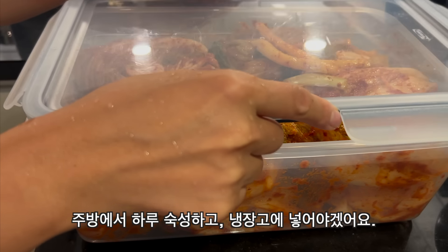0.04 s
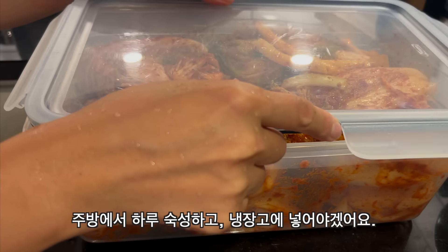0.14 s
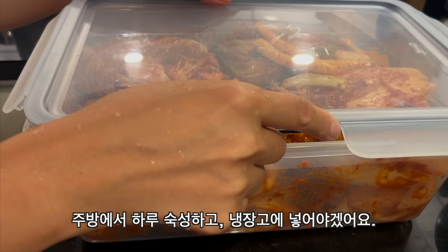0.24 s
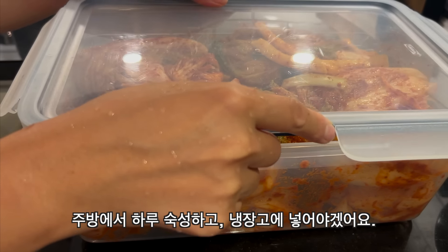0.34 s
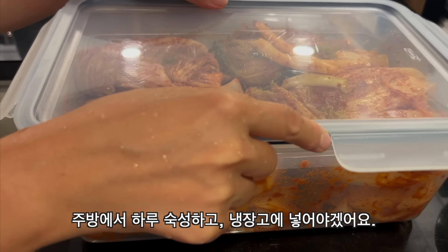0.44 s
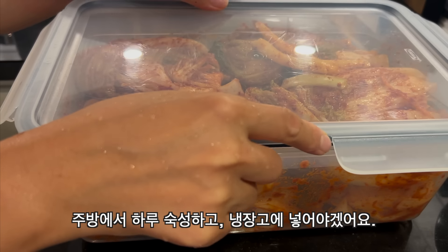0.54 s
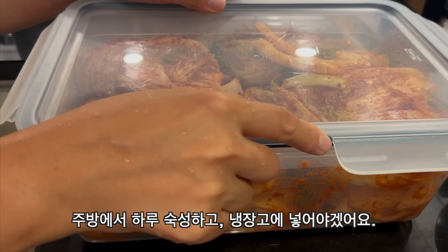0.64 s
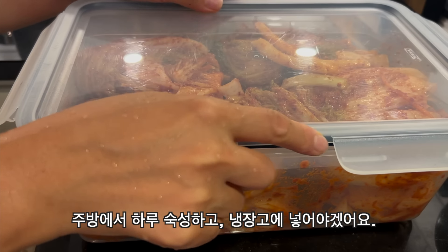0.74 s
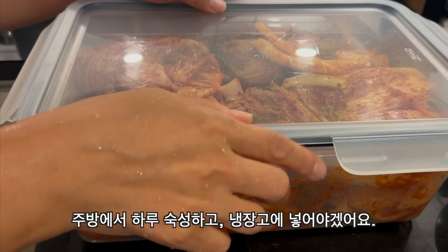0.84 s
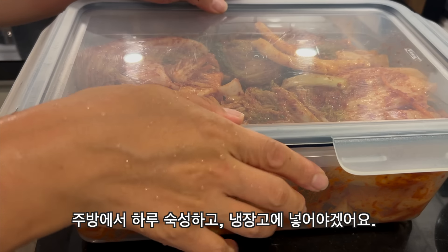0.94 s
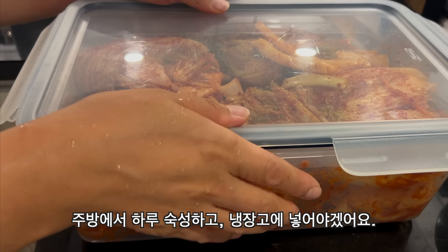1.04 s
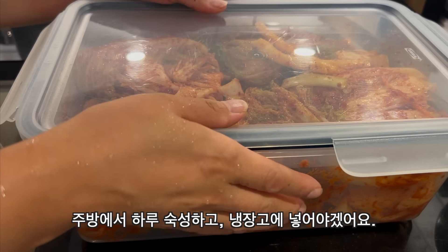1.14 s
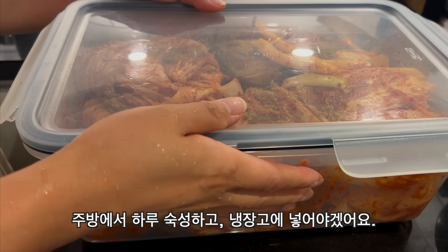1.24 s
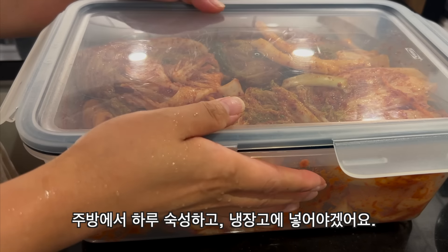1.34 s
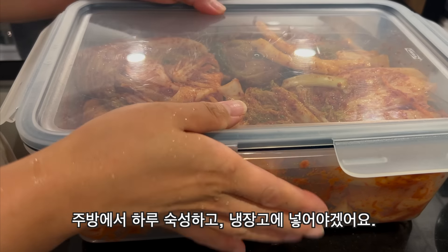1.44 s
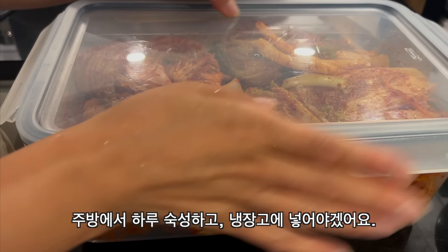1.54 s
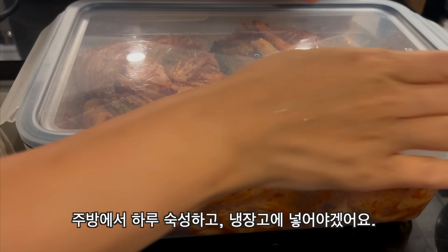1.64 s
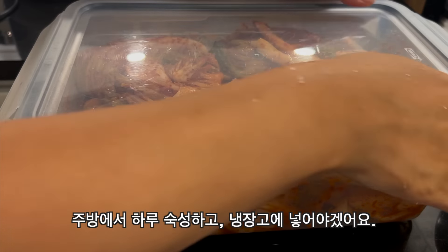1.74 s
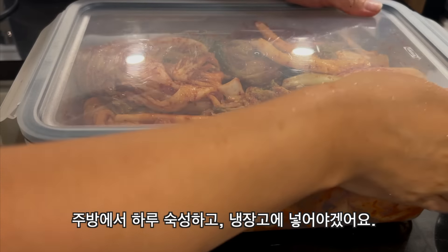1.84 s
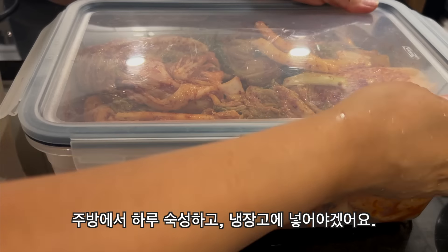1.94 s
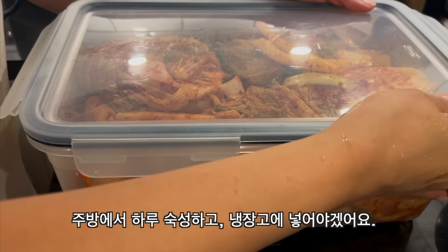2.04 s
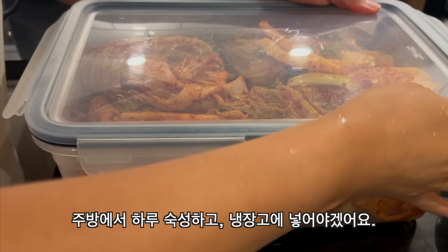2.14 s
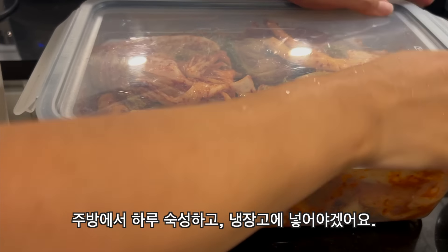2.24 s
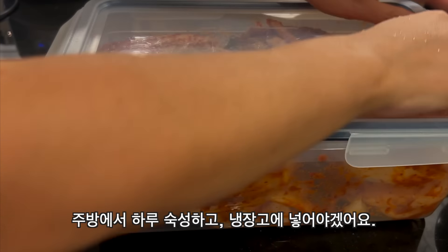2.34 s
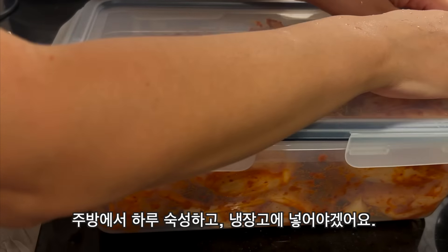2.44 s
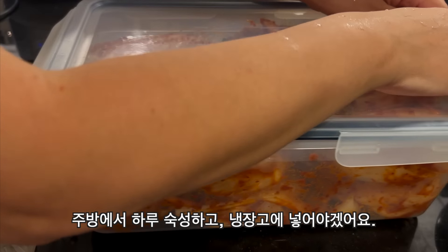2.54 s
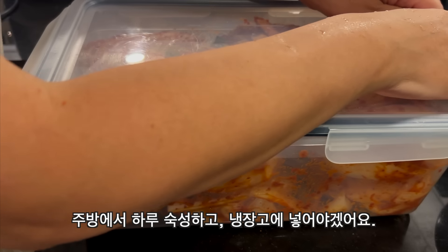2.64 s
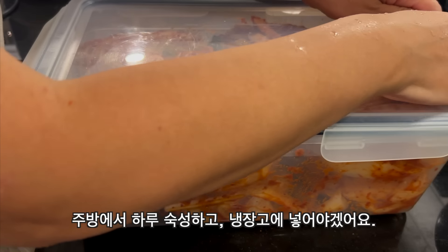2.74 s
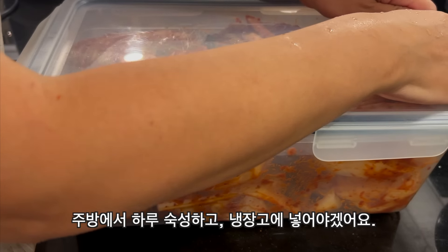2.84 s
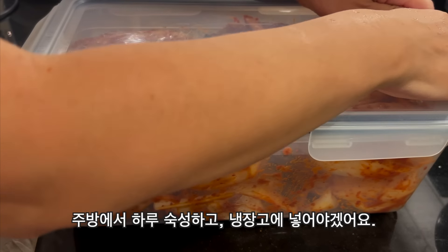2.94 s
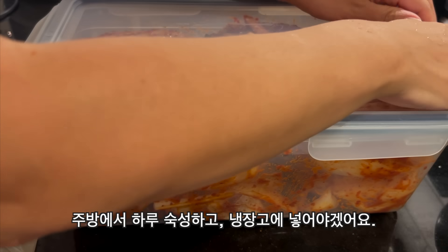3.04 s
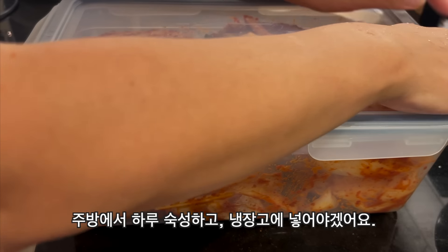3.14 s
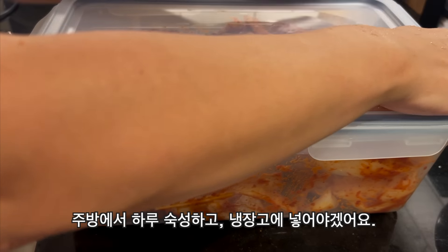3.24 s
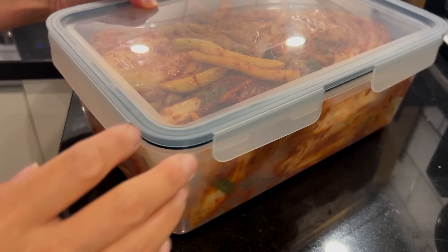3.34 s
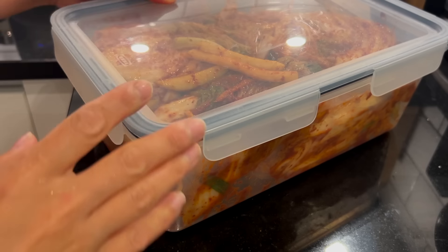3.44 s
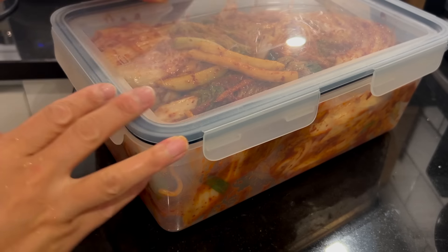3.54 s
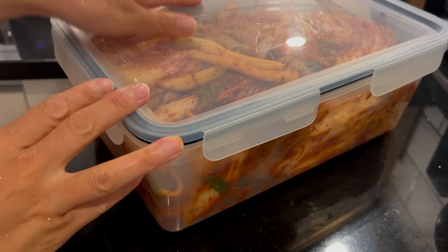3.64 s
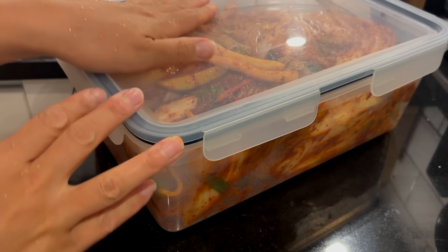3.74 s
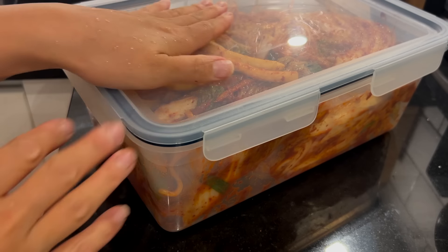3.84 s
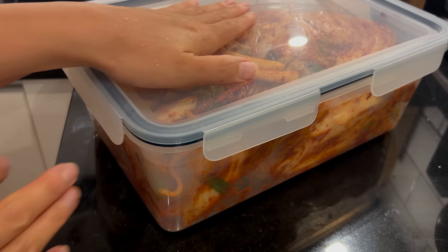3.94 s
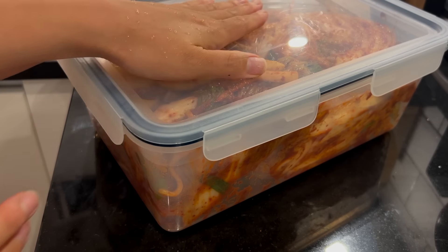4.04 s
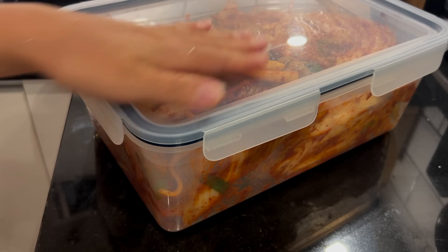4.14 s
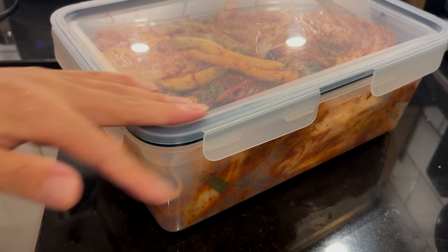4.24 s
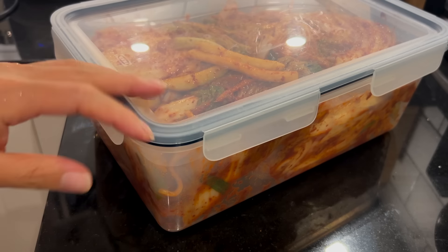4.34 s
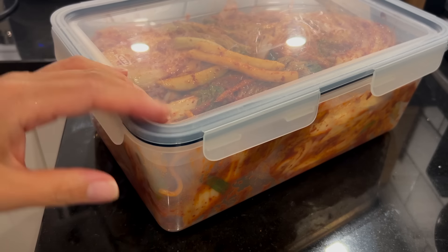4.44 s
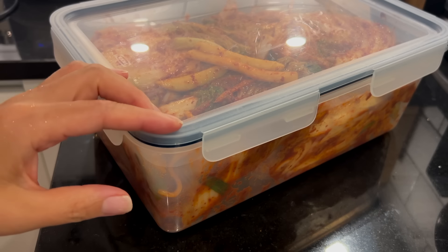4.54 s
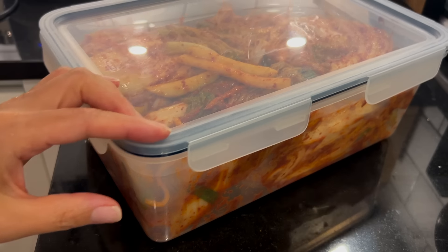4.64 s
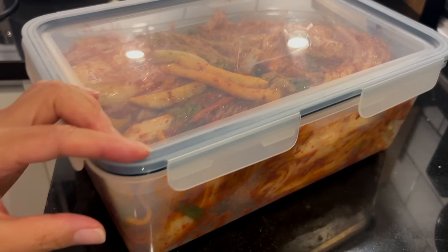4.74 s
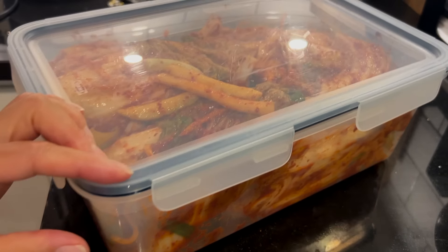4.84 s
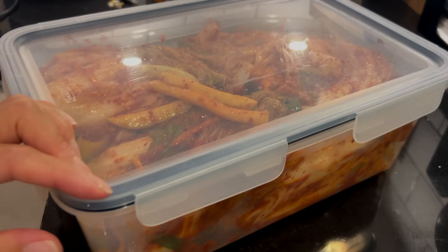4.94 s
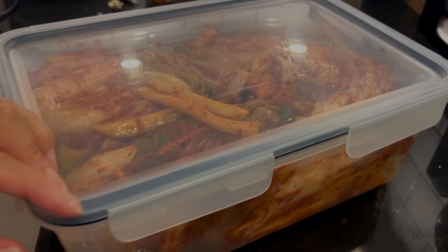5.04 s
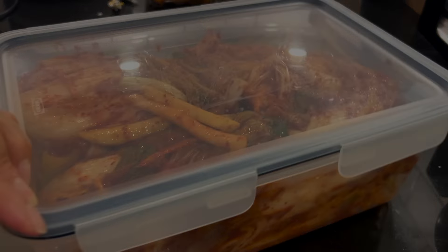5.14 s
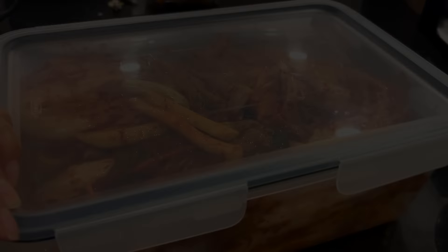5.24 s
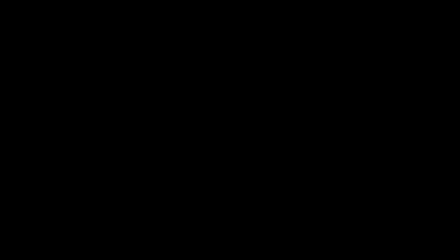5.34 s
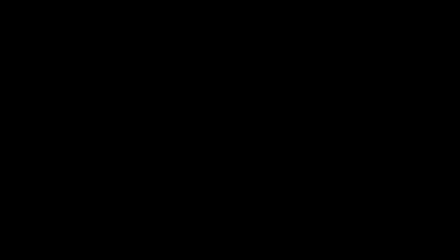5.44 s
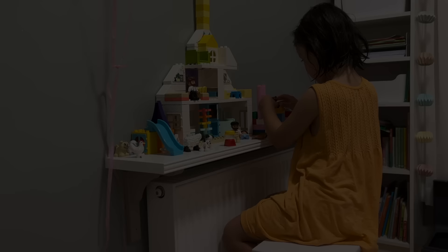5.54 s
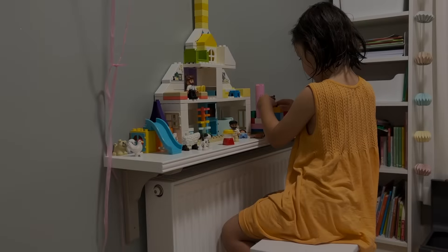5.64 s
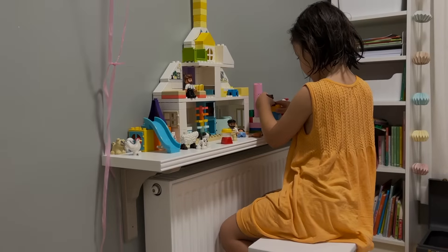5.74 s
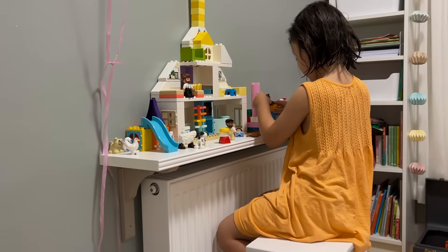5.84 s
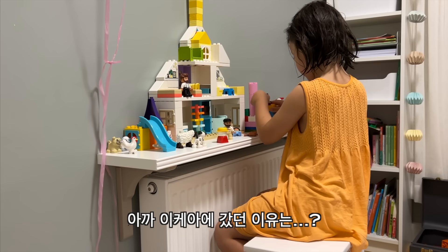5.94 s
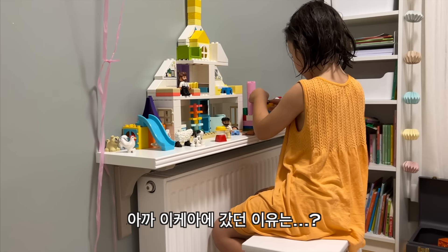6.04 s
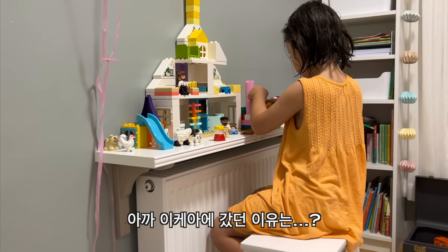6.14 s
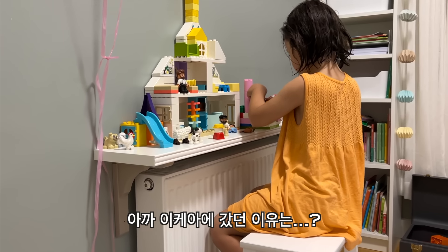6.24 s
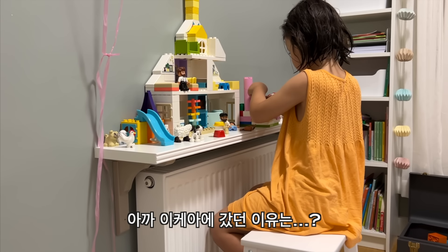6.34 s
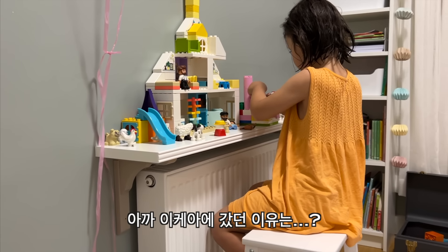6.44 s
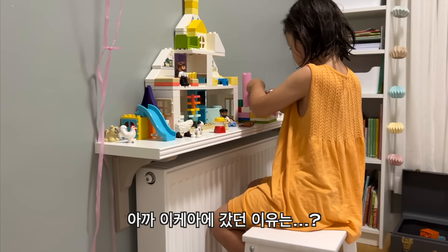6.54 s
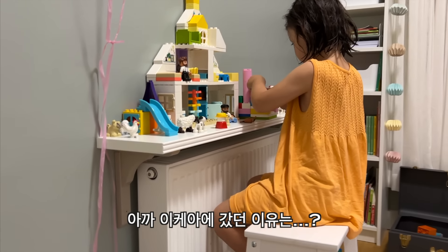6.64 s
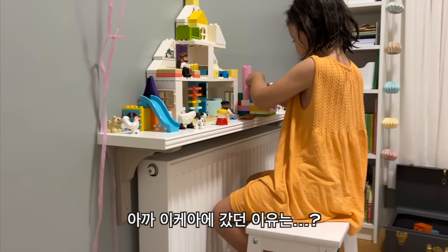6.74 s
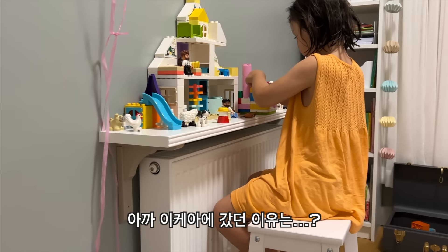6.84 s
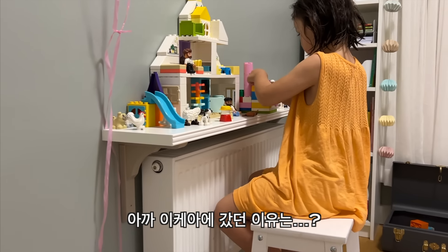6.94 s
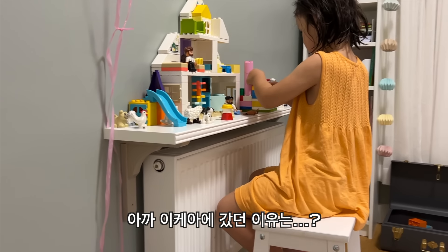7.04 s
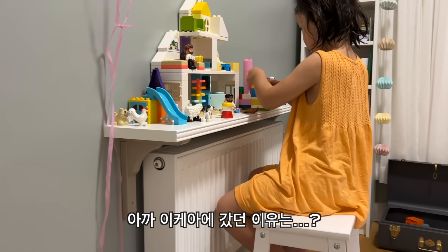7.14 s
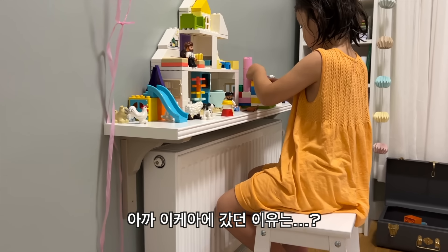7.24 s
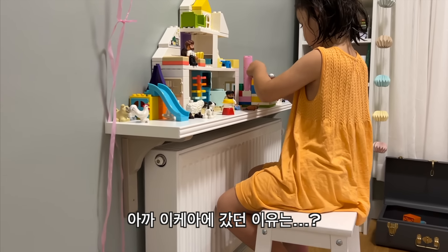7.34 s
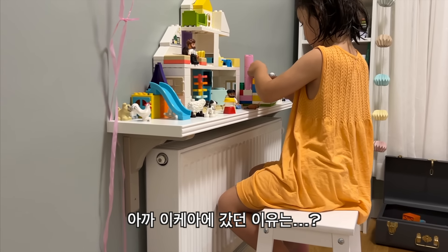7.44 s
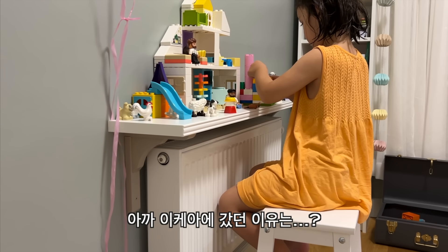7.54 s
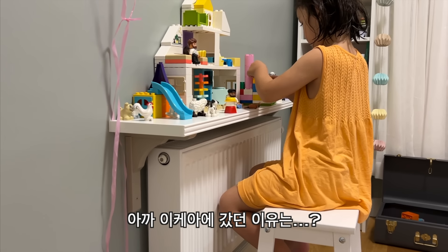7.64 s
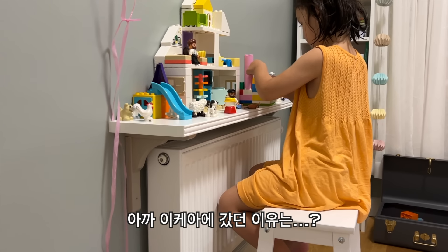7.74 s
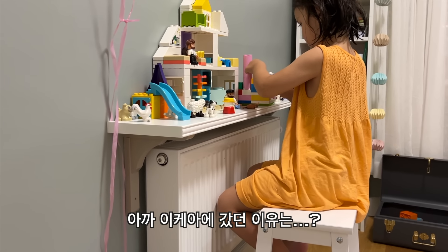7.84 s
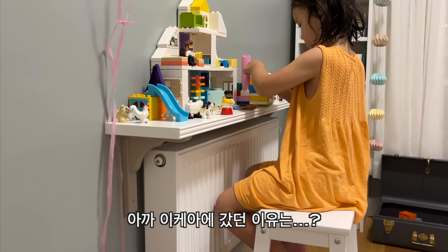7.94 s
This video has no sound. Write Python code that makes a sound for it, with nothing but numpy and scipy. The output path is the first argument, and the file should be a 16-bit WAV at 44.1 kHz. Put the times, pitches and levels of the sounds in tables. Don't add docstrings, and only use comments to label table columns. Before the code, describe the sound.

Close phone-like stereo in a hard kitchen with low rumble and appliance hum. At 0.1 s a stiff plastic flap snaps over the rim with a hollow knock; smaller snaps follow at 0.3 and 0.45, then a low bump at 0.5. A rough drag and weighty push at 1.0 lead into very loud cracks at 1.15-1.3, the lid ringing briefly and the seal buzzing. Softer clicks from 1.8 build to another violent snap at 2.0, with a thump and short rattle. From 2.3 to 5.3 it is much quieter: palms rub and swish, light ticks at 2.55, a dull bump at 3.2, a tiny squeak near 4.15, taps at 4.2-4.3. Around 5.5 the sound dips into a quieter room. From 5.7 small hard bricks click irregularly on a shelf, clearest at 5.8, 6.2 and 6.4, with faint scrapes and a soft knock near 6.85, thinning to sparse clicks at 7.3 and 7.9.

```python
import sys
import numpy as np
from scipy import signal
from scipy.fft import rfft, irfft, next_fast_len
from scipy.io import wavfile

SR = 44100
rng = np.random.default_rng(int(sys.argv[2]) if len(sys.argv) > 2 else 0)


def to_linear_factor(level_db):
    exponent = np.asarray(level_db, float) / 20
    return 10 ** exponent


def waveform_to_disk(signal):
    frames = np.transpose(np.atleast_2d(signal))
    scaled = np.clip(frames, -1, 1) * 32767
    samples = np.round(scaled).astype(np.int16)
    wavfile.write(sys.argv[1], SR, samples)


N = 352844

# time in seconds, rumble level in dB.
HOUSE = [(0, -54.5), (2.3, -55), (2.8, -51), (5.3, -51), (5.7, -70), (6.9, -72.5), (8, -76)]


def rms_one(x):
    return x / np.sqrt(np.mean(x ** 2) + 1e-20)


def in_time(rows):
    s, *columns = np.transpose(rows)
    return [np.interp(np.arange(N) / SR, s, column) for column in columns]


def at_hz(points, hz):
    table_hz, values = np.transpose(points)
    return np.interp(np.log(hz), np.log(table_hz), values)


def band_filter(x, order, edge_hz, kind):
    return signal.sosfilt(signal.butter(order, edge_hz, kind, fs=SR, output="sos"), x)


def notch(x, hz, width_hz):
    return signal.lfilter(*signal.iirnotch(hz, hz / width_hz, fs=SR), x)


def drift(rate_hz):
    r = np.exp(-2 * np.pi * rate_hz * 40 / SR)
    white = rng.standard_normal(N // 40 + 2002)
    slow = signal.lfilter([1], [1, -2 * r, r * r], white)[2000:]
    return np.interp(np.arange(N) / 40, np.arange(len(slow)), rms_one(slow))


def add(out, s, sound, pan_db):
    i = round(s * SR)
    gains = to_linear_factor(np.array([[pan_db], [-pan_db]]) / 2)
    out[:, i:i + sound.shape[-1]] += gains * sound[..., :N - i]


def ring(hz, t60, rise_s, phase=0):
    t = np.arange(SR // 4) / SR
    envelope = to_linear_factor(-60 * t / max(t60, .002)) * (1 - np.exp(-t / rise_s))
    return envelope * np.sin(2 * np.pi * hz * t + phase)


def clicks(events, modes, low_hz, top_hz):
    dry, feed, t = np.zeros((2, N)), np.zeros((2, N)), np.arange(SR // 20) / SR
    impulse = (t == 0).astype(float)
    crack = band_filter(band_filter(impulse, 2, [low_hz, top_hz], "band"), 2, 9000, "low")
    edge = to_linear_factor(2.5) * band_filter(band_filter(impulse, 2, top_hz, "high"), 2, 11500, "low")
    for s, db, bright_db, room_db, spot_hz, rattle_s, hump_db in events:
        chance = rng.standard_normal(len(modes) + 1)
        humps = to_linear_factor(hump_db) * ring(spot_hz, 9 / spot_hz, 1e-4)
        for (hz, mode_db, t60), a in zip(modes, chance):
            humps = humps + to_linear_factor(mode_db + 1.5 * a) * ring(hz, t60, 1e-4)
        humps = humps[:len(t)]
        noise = rng.standard_normal((3, len(t)))
        slip = noise[0] + .38 * noise[1:] + 2.5 * impulse
        slip = slip * np.exp(-t / np.clip(rattle_s / 3, 1e-4, .01))
        sound = signal.fftconvolve(slip, (crack + humps - to_linear_factor(bright_db + 8.5) * edge)[None])
        add(dry, s, sound * to_linear_factor(db) / np.abs(sound.mean(axis=0)).max(), .5 + .6 * chance[-1])
        dull = crack + humps / np.e - to_linear_factor(bright_db + 2.0) * edge
        add(feed, s, to_linear_factor(db + room_db + 8.0) * dull, 0)
    return dry, feed[0]


def flaps():
    # start in seconds, peak in dB, brightness in dB, room in dB, hump in Hz.
    snaps = [(0.1206, -13, -14, -15.5, 3300), (0.393, -31.5, -38, -15.5, 2900),
             (0.4465, -32.5, -39, -16, 3060), (1.2106, 1.5, -19, -29, 2900), (1.865, -25, -20, -29.5, 1900),
             (1.917, -32.5, -34.5, -25, 2250), (1.9983, 1, -12.5, -24.5, 1100)]
    chatters = [(0.0756, -26.5, -12, -8.5, 4230), (0.281, -19.5, -25, -19, 2740),
                (0.4634, -12, -13, -19, 1050), (1.158, -17, -18, -7.5, 3000),
                (1.2947, -5, -15.5, -24.5, 4000), (1.8108, -27, -23, -5.5, 3997),
                (1.9485, -10.5, -17, -16, 820)]
    cracks = [(1.8645, -26, -20, -25, 4700), (1.8876, -15, -19, -20, 900), (1.9819, 4.5, -15, -30, 2500)]
    # start in seconds, peak in dB, brightness in dB, hump in Hz.
    ticks = [(.5422, -40, -30, 1830), (.5552, -37, -30, 1240), (1.0173, -39, -40, 1880),
             (1.023, -35, -40, 1740), (1.0243, -35, -40, 1500), (1.485, -34, -25, 3500),
             (2.4549, -32, -12, 1000), (2.5036, -38, -19, 1200), (2.5461, -22, -5, 3200),
             (2.7836, -43.5, -21, 3320), (2.8551, -34, -39, 2350), (2.8822, -39, -15, 1100),
             (3.2243, -35.5, -23, 4110), (3.4818, -42, -22, 1900), (4.0265, -48, -20, 3300),
             (4.185, -25.5, -9, 806), (4.3141, -22, -3, 2680), (4.366, -40, -12, 4900),
             (4.214, -43, -25, 2900), (5.3028, -42, -18.5, 2720)]
    # pitch in Hz, level in dB, t60 in seconds.
    flap_modes = [(1100, -19.5, 0.0053), (2100, -14.5, 0.006)]
    events = []
    for rows, rattle_s in [(snaps, .0025), (chatters, 0.0083), (cracks, 0.0011)]:
        events += [(*row, rattle_s, -12.5) for row in rows]
    for s, db, bright_db, hz in ticks:
        events.append((s, db, bright_db, -17, hz, 0.00269, -8))
    dry, feed = clicks(events, flap_modes, low_hz=606, top_hz=4500)
    dry = notch(dry, hz=5450, width_hz=1100)
    return notch(dry, hz=1580, width_hz=450), feed


def bricks():
    # start in seconds, peak in dB, brightness in dB, room in dB, hump in Hz.
    meetings = [(5.679, -43.5, -21, 2, 1731), (5.701, -41.5, -26, 4, 2460), (5.824, -34, -36.5, -4, 1650),
                (5.884, -53, -29.5, -10, 1827), (6.015, -44, -19, 3.5, 2662),
                (6.147, -46.5, -15, 8.5, 3430), (6.186, -35.5, -1, 2.5, 1930), (6.42, -33, -13, -1.5, 2766),
                (6.693, -45, -24, -8.5, 3460), (6.852, -46, -16.5, 1, 1498), (6.977, -56, -25, 1, 2350),
                (7.324, -42.5, -17, 3, 2700), (7.944, -40.5, -15.5, 1.5, 3600)]
    # pitch in Hz, level in dB, t60 in seconds.
    brick_modes = [(673, -14, 0.0075), (1150, -15, 0.0023)]
    rattle_s, hump_db = 0.0035, -11.5
    events = [(*row, rattle_s, hump_db) for row in meetings]
    return clicks(events, brick_modes, low_hz=455, top_hz=4700)


def knocks():
    # start in seconds, peak in dB, pitch in Hz, t60 in seconds, room in dB.
    lid = [(0.076, -36, 554, 0.05, -26), (0.119, -17, 717, 0.03, -14.5), (0.281, -22.5, 574, 0.035, -16),
           (0.393, -32.5, 574, .04, -3.5), (0.453, -23, 510, 0.022, -4), (0.463, -12, 535, 0.017, -17),
           (0.614, -25, 393, 0.0396, -24), (0.703, -36, 367, 0.071, -27), (1.159, -1.5, 374.6, 0.0327, -17),
           (1.222, -12, 510, .06, -26), (1.31, -17, 600, 0.062, -27), (1.209, -5, 413, 0.055, -17.5),
           (1.2945, -5.5, 398, 0.036, -35.5), (1.529, -38, 373, 0.059, -23.5), (1.864, -29, 393, 0.027, 0),
           (1.948, -10.5, 377, 0.042, -13), (1.982, -20, 680, 0.03, -20), (1.997, -2.5, 386, 0.038, -36),
           (2.318, -38, 244, 0.06, -2), (2.353, -34, 236, 0.16, -10), (2.608, -35, 300, 0.02, -15),
           (2.547, -30.5, 343, 0.055, -6), (3.226, -31, 385, 0.07, -16), (2.938, -44, 387, 0.029, 2),
           (4.188, -34, 359, 0.014, 0.5)]
    # start in seconds, peak in dB, room in dB.
    wall = [(0.503, -20.5, -8.5), (1.749, -38, -1), (1.812, -30.5, 2.5), (1.891, -17, -7),
            (2.506, -35.5, 0), (3.234, -23.5, -9.5), (3.27, -44.5, -17), (4.203, -29.5, -0.5),
            (4.315, -39, 1.5)]
    shelf = [(5.685, -42.5, 185.9, .047, -8), (5.822, -33.5, 1233, 0.042, -10),
             (6.189, -41, 276, 0.13, 3.5), (6.421, -42, 606, 0.053, -8), (6.859, -40.5, 244, 0.0366, 4.5),
             (7.414, -51.5, 248.3, 0.044, -8.5), (7.538, -55, 235, .04, -16.5)]
    blows = [(*row, -0.9 if row[2] > 450 else 4) for row in lid]
    blows += [(s, db, 191.8, 0.05, room_db, 0.7) for s, db, room_db in wall]
    blows += [(*row, -1) for row in shelf]
    dry, feed, lean = np.zeros((2, N)), np.zeros((2, N)), np.array([[.5], [-.5]])
    for s, db, hz, t60, room_db, pan_db in blows:
        a, b, c = rng.standard_normal(3)
        sound = ring(hz, t60 * 0.72, 0.0032)
        sound = sound + to_linear_factor(-12) * ring(hz * (.58 + .02 * c), t60 * 1.5, 0.0072)
        sound = sound + (1 - lean) * to_linear_factor(-6.5 + 2 * a) * ring(hz * (1.45 + 0.14 * b), t60 * .6, .002)
        sound = sound + (1 + lean) * to_linear_factor(-14.5) * ring(hz * (1.22 + 0.066 * c), t60 * 1.6, 0.0034, a)
        add(dry, s + 0.0011, sound * to_linear_factor(db) / np.abs(sound.mean(axis=0)).max(), pan_db - 2.04)
        add(feed, s, to_linear_factor(db + room_db) * ring(hz * 0.83, 0.011, 0.0025), 0)
    return dry, feed[0]


def ringing(strikes, body):
    shake_s, off_spot_db = 0.0031, 7.5
    out, t = np.zeros((2, N)), np.arange(SR // 40) / SR
    rings = [ring(hz, t60, 1e-4) for hz, _, t60 in body]
    for s, db, spot_hz in strikes:
        modes = 0
        for (hz, mode_db, _), mode in zip(body, rings):
            modes = modes + to_linear_factor(mode_db - off_spot_db * abs(np.log2(hz / spot_hz))) * mode
        noise = rng.standard_normal((3, len(t))) * np.exp(-t / shake_s)
        shake = (noise[0] + .9 * noise[1:]) / np.sqrt(shake_s * SR)
        add(out, s, to_linear_factor(db) * signal.fftconvolve(shake, modes[None]), 0)
    return out


def lid_plate():
    # start in seconds, level in dB, best excited pitch in Hz.
    strikes = [(.1205, -36, 810), (.2815, -45.5, 900), (.463, -35, 850), (1.159, -41, 2600),
               (1.2105, -31, 1900), (1.2945, -26.5, 3000), (1.865, -44.5, 1100), (1.948, -36.5, 900),
               (1.9985, -21.5, 1050), (2.547, -53, 1500), (4.315, -53, 1100)]
    # pitch in Hz, level in dB, t60 in seconds.
    plate_modes = [(651, -1.5, .15), (763, -3.5, .12), (967, -1.5, 0.13), (1020, -6, 0.3), (1114, -1, 0.17),
                   (1300, -4, 0.2), (1380, -3, 0.23), (2065, -0.5, .15), (2150, -6, .4), (2330, -4, .25),
                   (2750, -7, 0.13), (3300, -4.5, 0.08), (3650, -5, .1), (3970, -5, .13)]
    return ringing(strikes, plate_modes)


def shelf_board():
    # start in seconds, level in dB, best excited pitch in Hz.
    set_downs = [(5.68, -61, 1500), (5.823, -46, 1290), (6.015, -62, 2500), (6.186, -45, 2020),
                 (6.42, -53, 1100), (6.853, -62, 2210), (7.324, -62.5, 2000), (7.944, -59, 2000)]
    # pitch in Hz, level in dB, t60 in seconds.
    board_modes = [(600, 4, 0.28), (875, -10, .15), (1112, 1, 0.28), (1280, -9, .2), (1490, -4, .15),
                   (1740, 0, 0.18), (2060, -1, 0.19), (2350, 0, 0.18), (2750, 5, .12), (3450, -6, .1)]
    return ringing(set_downs, board_modes)


def thumps():
    # start in seconds, peak in dB, pitch in Hz, cycles to die away by 60 dB.
    rocks = [(0.49, -27, 115, 19), (1.033, -21, 95, 22), (1.052, -24.5, 75, 22), (1.156, -30, 161.4, 22),
             (1.21, -25, 170.6, 18), (1.295, -37, 173, 18), (1.879, -45, 162.3, 18), (1.948, -17, 202, 13),
             (1.998, -20.5, 92, 21), (2.781, -38, 95.5, 26), (2.981, -38.5, 104, 23.5),
             (3.234, -31.5, 124, 11), (3.271, -36, 103.4, 15), (4.196, -31, 173, 24),
             (6.871, -45.5, 82.97, 20)]
    out = np.zeros((2, N))
    for s, db, hz, cycles in rocks:
        t60 = cycles / hz
        sound = ring(hz, t60, 0.0042) + to_linear_factor(-6.5) * ring(hz * 0.73, t60 * 0.54, 0.0027)
        add(out, s, to_linear_factor(db) * sound / np.abs(sound).max(), -1.4)
    return out


def scrapes():
    # start in seconds, level in dB, t60 in seconds, centre in Hz, width in octaves.
    drags = [(.095, -37.5, 0.15, 1900, 0.42), (.541, -38, 0.52, 1550, 1.05),
             (1.012, -26.5, 0.38, 1200, 2.0), (4.352, -50, 0.1, 800, 1.0), (3.47, -48, 0.227, 450, 1.3),
             (1.018, -33, 0.4, 2500, 1.1), (2.761, -48.5, 0.4, 430, 0.64), (5.77, -47, 0.31, 890, 1.23),
             (6.27, -55, 0.43, 2500, 1.85), (3.14, -58, 0.11, 2500, 2.2), (3.222, -44, 0.09, 2000, 1.5),
             (3.131, -56, 0.16, 960, 0.29), (3.94, -56.5, 0.26, 1360, 0.37), (4.312, -42, 0.13, 600, 1.2),
             (4.18, -44, .25, 650, 1.2), (2.965, -49, .3, 700, 1.4)]
    buzzes = [(1.21, -20.5, 0.095, 2000, 1.3), (1.2945, -12.5, 0.036, 3000, 1.1),
              (1.295, -28.5, 0.23, 3170, 1.24), (1.295, -34, .55, 2150, .25), (1.81, -40, 0.09, 4150, 0.4),
              (1.999, -14, 0.088, 1390, 2), (2.002, -30, 0.22, 3161, 2.1), (2.854, -41, .06, 2400, 0.43),
              (6.85, -53, 0.3, 605, 0.64), (3.24, -46.5, 0.11, 456, 1.4), (6.426, -43.5, 0.29, 1150, 0.76),
              (6.849, -63, .052, 11940, 0.36), (4.02, -48, 0.093, 3450, 0.43)]
    out, t = np.zeros((2, N)), np.arange(SR // 2) / SR
    grip = np.pad(drift(70), (0, SR))
    for rows, rise_s, grip_db in [(drags, 0.0138, 1.8), (buzzes, 0.0021, 1.0)]:
        for s, db, t60, hz, octaves in rows:
            noise = rng.standard_normal((3, len(t)))
            edges = hz * 2 ** (np.array([-.5, .5]) * octaves)
            grit = band_filter(noise[0] + noise[1:], 2, edges, "band")
            level_db = db - 60 * t / t60 + grip_db * grip[round(s * SR):][:len(t)]
            add(out, s, rms_one(grit) * to_linear_factor(level_db) * np.minimum(t / rise_s, 1), 0)
    return out


def squeak():
    # time in seconds, pitch in Hz, level in dB.
    glide = [(0, 1370, -58), (.035, 1370, -61), (.05, 1370, -125), (4.0, 2000, -125), (4.11, 2050, -66),
             (4.15, 2000, -64), (4.178, 2300, -56), (4.19, 2300, -125), (6.4, 1200, -125), (6.6, 1470, -75),
             (6.72, 1540, -70), (6.78, 1550, -70), (6.85, 1520, -70), (6.93, 1400, -76), (7.1, 1200, -125)]
    hz, db = in_time(glide)
    phase = 2 * np.pi * np.cumsum(hz + 25 * drift(15)) / SR
    return to_linear_factor(db) * ((.8 + .5 * drift(70)) * np.sin(phase) + .5 * drift(70) * np.cos(phase))


def bands(size):
    # pitch in Hz, left-right likeness from 0 to 1.
    likeness = [(60, 0.96), (250, 0.81), (1000, 0.42), (2400, 0.8), (5500, 0.088), (7000, 1)]
    edges_hz = 22 * 2 ** np.arange(0, 9.7, .5)
    white = rng.standard_normal((2, 2, size))
    for k, (low, high) in enumerate(zip(edges_hz, edges_hz[1:])):
        mid, side = band_filter(white[k % 2], 2, [low, high], "band")
        hz = np.sqrt(low * high)
        alike = np.clip(at_hz(likeness, hz), 0, 1)
        yield hz, np.sqrt(1 + alike) * mid + np.sqrt(1 - alike) * side * [[1], [-1]]


def strokes(rows, floor_db):
    t = np.arange(0, N + 32, 32) / SR
    power = 0
    for s, db, up_s, down_s in rows:
        power = power + to_linear_factor(2 * db - 20 * np.maximum((s - t) / up_s, (t - s) / down_s))
    return 10 * np.log10(np.interp(np.arange(N) / SR, t, power) + to_linear_factor(2 * floor_db))


def stroke_levels():
    # peak in seconds, level in dB, seconds for the last 10 dB up, seconds for the first 10 dB down.
    pushes = [(.15, -50, 0.5, .2), (.58, -43.5, 0.2, 0.22), (1.07, -29, 0.05, 0.07),
              (1.2, -34.5, 0.1, 0.13), (1.96, -32, 0.0012, 0.07), (5.86, -56, 0.24, 0.1),
              (7.51, -64, -0.3, -0.1)]
    rubs = [(0, -60, .05, 0.061), (.27, -56, 0.18, 0.24), (.58, -50, 0.075, 0.2),
            (1.07, -36.5, 0.029, 0.11), (1.3, -36, 0.11, 0.11), (1.872, -39, .008, 0.05),
            (2.0, -28.5, 0.0079, 0.105), (2.54, -54.5, 0.36, 0.065), (3.03, -65.5, 0.52, 0.22),
            (4.28, -60, 0.27, 0.038), (5.3, -57, 0.051, 0.1124), (5.832, -45.5, 0.0046, 0.065),
            (6.24, -59, 0.15, 0.157), (6.86, -70.5, 0.778, .25), (7.7, -76, 0.093, 0.49)]
    swishes = [(0, -67.5, .1, 0.18), (.32, -60, 0.088, 0.49), (.88, -59.5, 0.24, 0.059),
               (1.24, -54.5, 0.05, 0.24), (1.66, -56, 0.16, 0.49), (2.2, -61, 0.3, 0.15),
               (2.28, -56, 0.066, 0.0186), (2.38, -57, 0.083, 0.12), (2.55, -54, 0.0036, 0.0041),
               (2.74, -66.5, 0.072, 0.15), (3.02, -55.5, 0.037, 0.049), (3.16, -62, .08, 0.039),
               (3.43, -58, 0.041, 0.0193), (3.53, -59.5, 0.043, 0.053), (3.74, -56, 0.049, 0.19),
               (3.95, -57, 0.075, 0.058), (4.12, -47.5, 0.024, 0.11), (4.19, -46.5, 0.0122, 0.043),
               (4.32, -46, 0.005, 0.0066), (4.45, -60, 0.072, 0.032), (4.7, -57, 0.1287, 0.41),
               (5.11, -59.5, 0.095, 0.23), (5.31, -56.5, 0.017, 0.08), (6.22, -54.5, 0.048, 0.06),
               (7.0, -80.5, 1, 1.137)]
    # time in seconds, level in dB.
    fade = [(5.42, 0.0), (5.6, -5.5), (5.668, -5.5), (5.678, 0.0)]
    (house_db,), (fade_db,) = in_time(HOUSE), in_time(fade)
    push_db = strokes(pushes, house_db - 3.0)
    rub_db = strokes(rubs, house_db - 16) + fade_db
    return push_db, rub_db, strokes(swishes, house_db - 28.5) + fade_db


def backgrounds():
    # pitch in Hz, level in dB per Hz.
    rumble_db = [(21, -34), (35, -8.5), (54, 0.5), (139, -3), (330, -13), (460, -24.5), (910, -49.5),
                 (1540, -120)]
    rubbing_db = [(180, -30), (300, -7), (448, -11), (808, -7), (1400, -7), (6000, -26), (7800, -62.5),
                  (13200, -120)]
    hiss_db = [(1500, -23.5), (2500, -1.5), (5000, -1), (8000, 1), (12000, -2), (14500, -6), (16000, -25)]
    drone_db = [(20, -19.5), (32, -6), (48, 1), (65, -9.5), (95, -13.5), (140, -39)]
    rumble, rubbing, hiss, drone = np.zeros((4, 2, N))
    together, lumps = drift(11), drift(25)
    for hz, band in bands(size=N):
        own = drift(13)
        if hz < 1400:
            rumble += band * to_linear_factor(at_hz(rumble_db, hz) + 2 * own + 1.5 * lumps)
        if 140 < hz < 10000:
            rubbing += band * to_linear_factor(at_hz(rubbing_db, hz) + 1.5 * own + 1.8 * lumps)
        if hz > 1400:
            hiss += band * to_linear_factor(at_hz(hiss_db, hz) + 0.93 * own + 1.5 * together)
        if hz < 140:
            drone += band * to_linear_factor(at_hz(drone_db, hz))
    rumble = notch(rumble, hz=262, width_hz=70)
    push_db, rub_db, swish_db = stroke_levels()
    hands = to_linear_factor(rub_db) * rms_one(rubbing) + to_linear_factor(swish_db) * rms_one(hiss)
    return hands + to_linear_factor(push_db) * rms_one(rumble) + to_linear_factor(-69.5) * rms_one(drone)


def hum():
    # pitch in Hz, width in Hz, level in dB against the room tone.
    hum_modes = [(52, 8.0, -7), (92, 12.0, -11), (138, 12.0, -8), (205, 25.0, -9), (228, 12.0, -15),
                 (316, 25.0, -13)]
    (house_db,) = in_time(HOUSE)
    mid, side = rng.standard_normal((2, N))
    white = band_filter(mid + .25 * side * np.array([[1], [-1]]), 8, 345, "low")
    out = np.zeros((2, N))
    for hz, width_hz, db in hum_modes:
        out += to_linear_factor(db) * rms_one(signal.lfilter(*signal.iirpeak(hz, hz / width_hz, fs=SR), white))
    return to_linear_factor(house_db) * out


def room(feed, decays, onset_s):
    t = np.arange(SR // 2) / SR
    tail = sum(band * to_linear_factor(-60 * t / at_hz(decays, hz)) for hz, band in bands(size=len(t)))
    tail = tail * (1 - np.exp(-t / onset_s)) / np.sqrt(np.sum(tail ** 2) / 2)
    return to_linear_factor(14) * signal.fftconvolve(feed[None], tail)[:, :N]


def echoes(flap_feed, brick_feed, knock_feed):
    # pitch in Hz, t60 in seconds.
    kitchen = [(150, 0.5), (500, 0.87), (2000, 0.14), (5000, 0.15), (12000, 0.19)]
    playroom = [(150, 0.53), (500, 0.59), (2000, 0.38), (5000, 0.29), (12000, 0.2)]
    later = np.arange(N) > 5.5 * SR
    wet = room(flap_feed + knock_feed * ~later, kitchen, onset_s=0.00079)
    return wet + room(brick_feed + knock_feed * later, playroom, onset_s=0.00093)


def scene():
    flap, flap_feed = flaps()
    brick, brick_feed = bricks()
    knock, knock_feed = knocks()
    blows = flap + brick + knock + lid_plate() + shelf_board() + thumps()
    friction = scrapes() + squeak()
    return blows + friction + backgrounds() + hum() + echoes(flap_feed, brick_feed, knock_feed)


def band_limit(x):
    return signal.sosfilt(signal.butter(12, 16680, fs=SR, output="sos"), x)


def record(dry):
    # pitch in Hz, phase in radians by which the left port leads.
    port_gap = [(0, 0), (2000, 0), (3100, 1), (5850, -1), (6900, 0), (10000, -3.14), (13400, -6.6),
                (16500, -9.8)]
    dry = band_filter(dry, 4, 40, "high")
    size = next_fast_len(N + 512)
    gap = np.interp(np.fft.rfftfreq(size, 1 / SR), *np.transpose(port_gap))
    ports = irfft(rfft(dry, size) * np.exp(.5j * gap * [[1], [-1]]), size)[:, :N]
    ports = .9 * np.tanh(ports / .9)
    ports = signal.sosfilt(signal.cheby2(8, 60, 16900, fs=SR, output="sos"), ports)
    return band_limit(ports)


dry = scene()
out = record(dry)
waveform_to_disk(out)
```